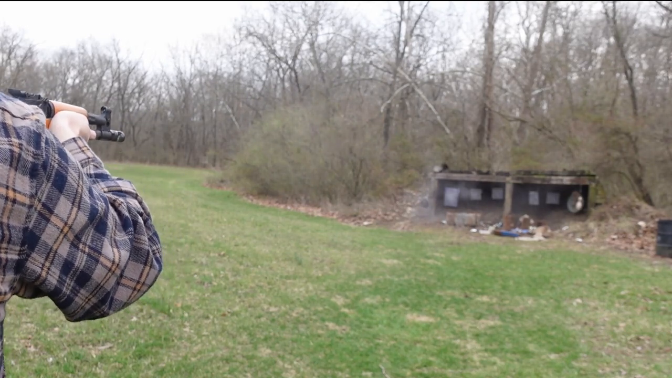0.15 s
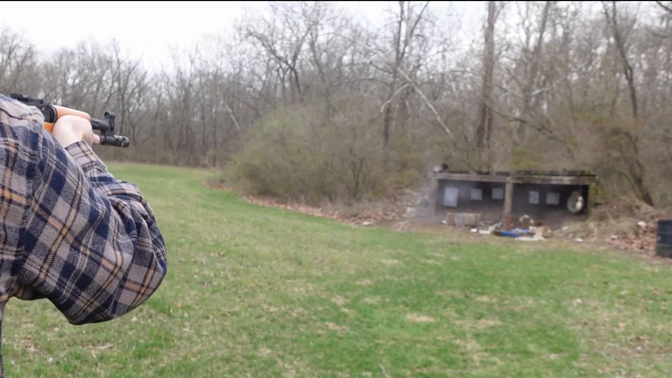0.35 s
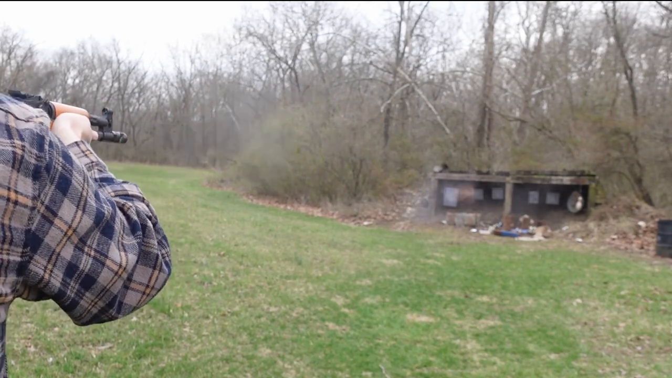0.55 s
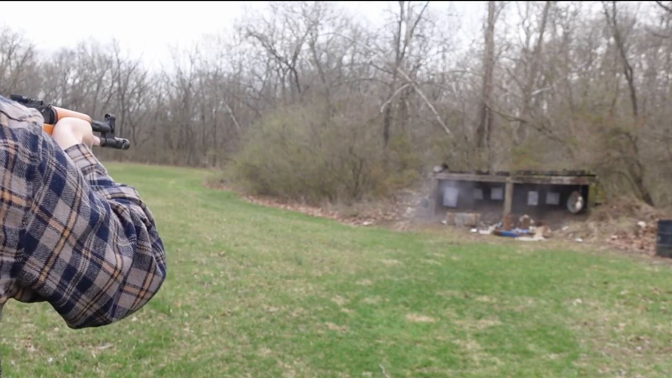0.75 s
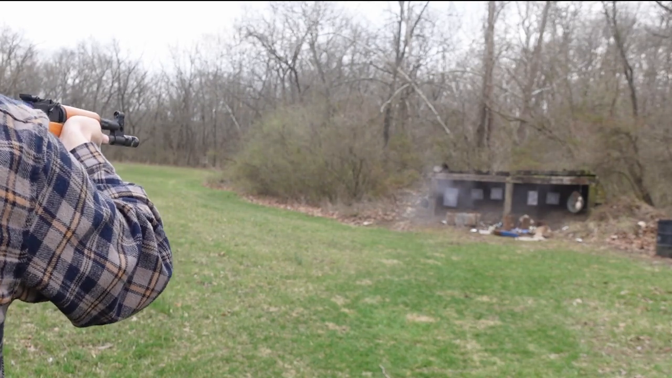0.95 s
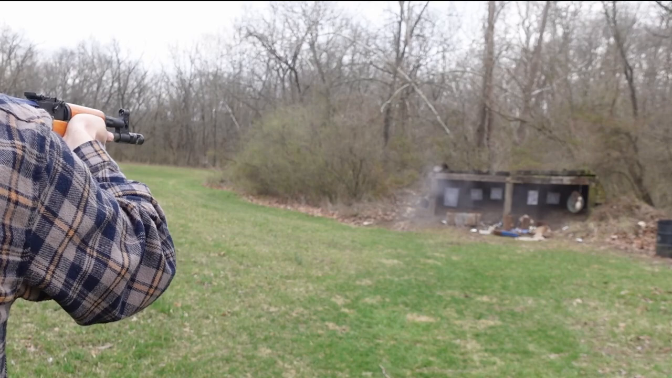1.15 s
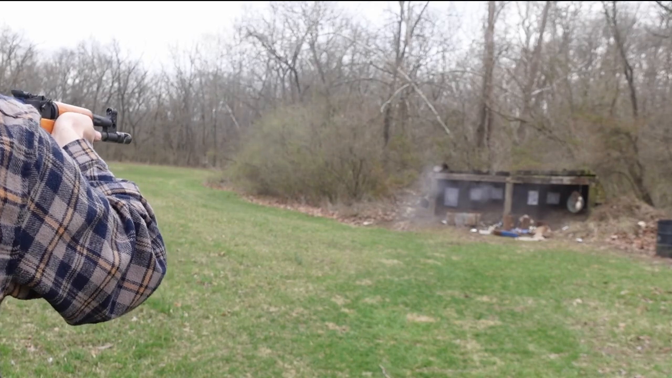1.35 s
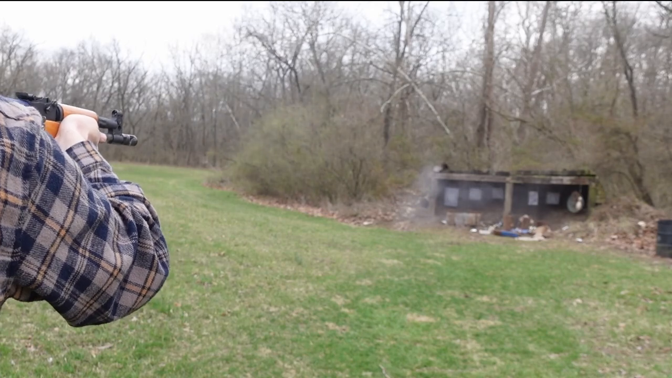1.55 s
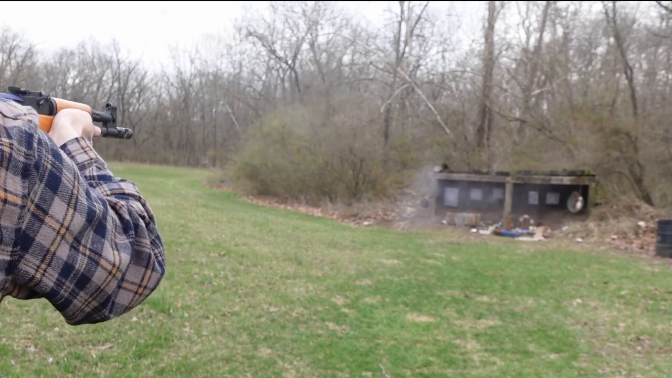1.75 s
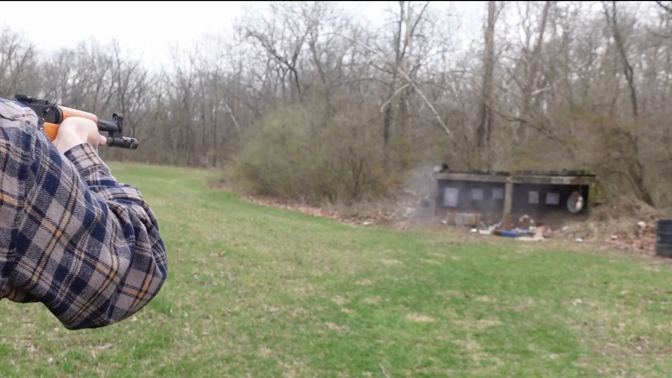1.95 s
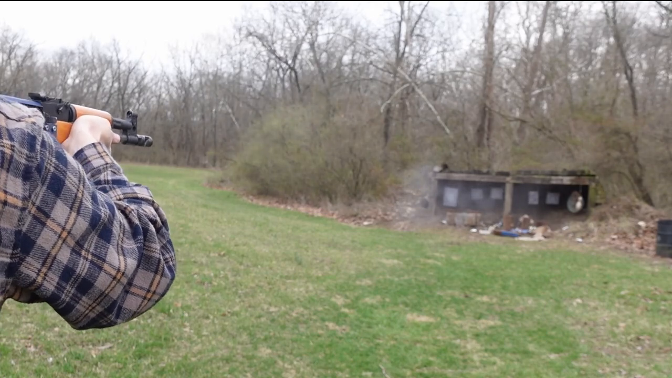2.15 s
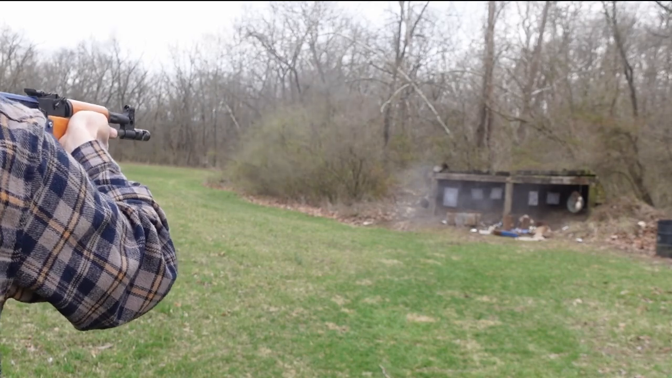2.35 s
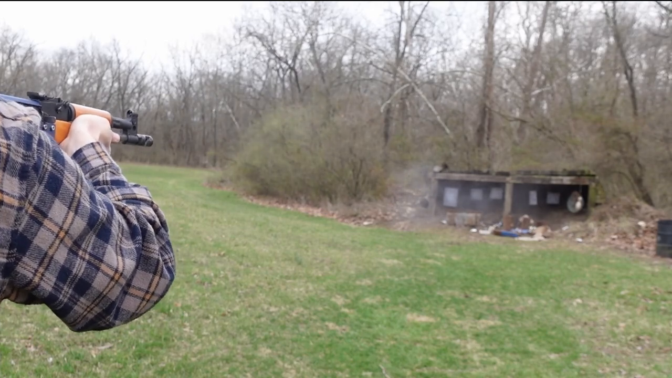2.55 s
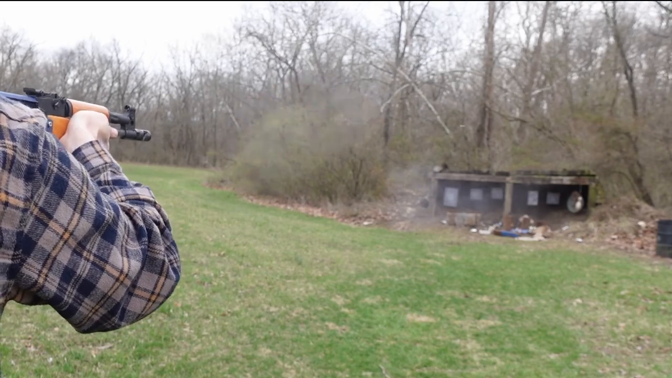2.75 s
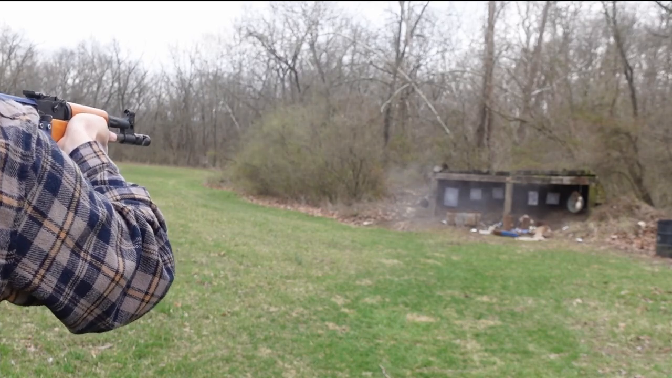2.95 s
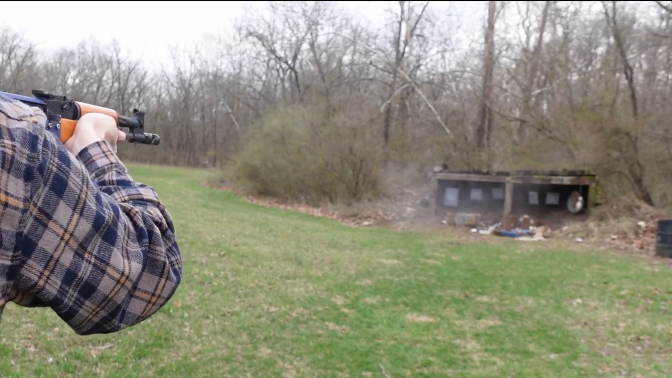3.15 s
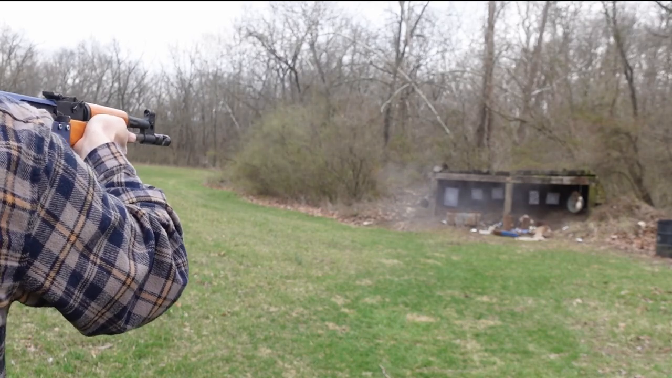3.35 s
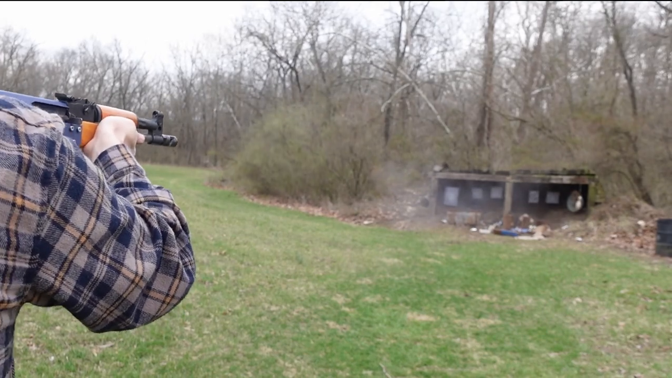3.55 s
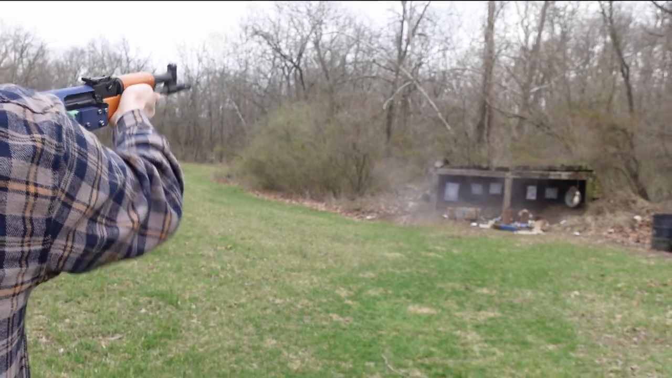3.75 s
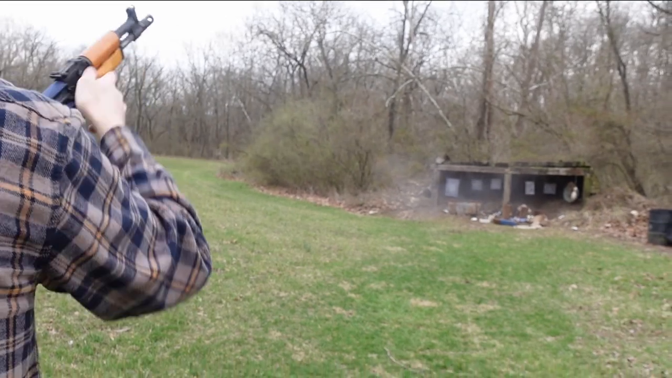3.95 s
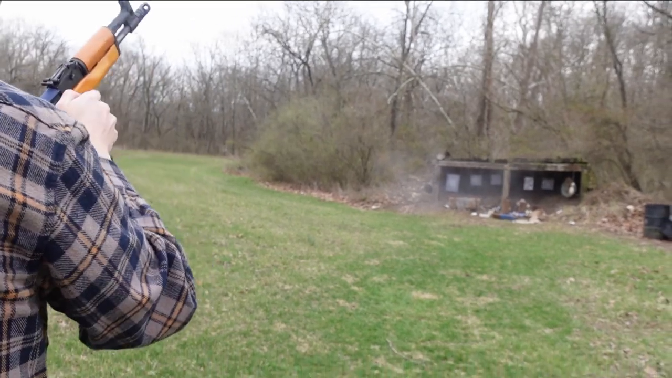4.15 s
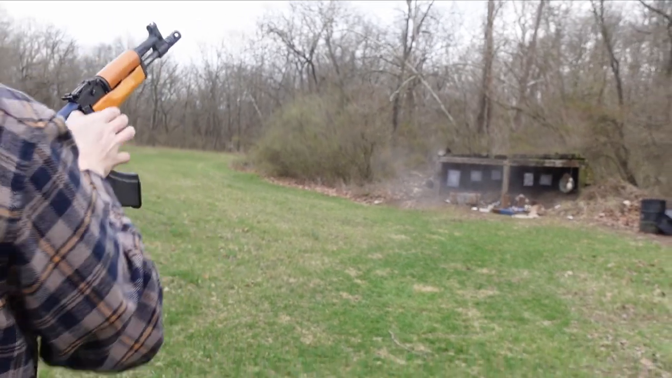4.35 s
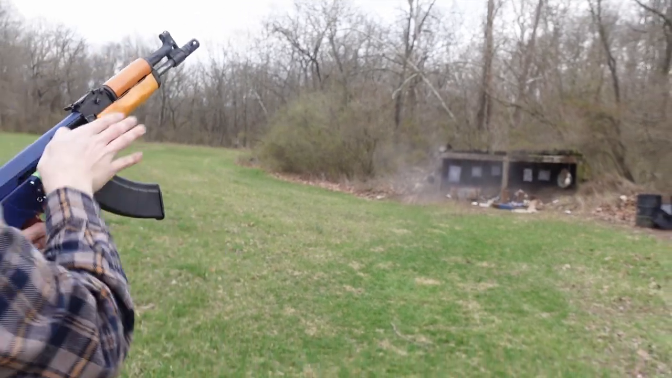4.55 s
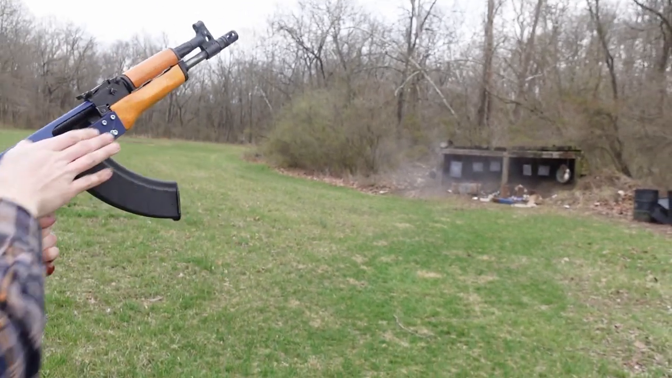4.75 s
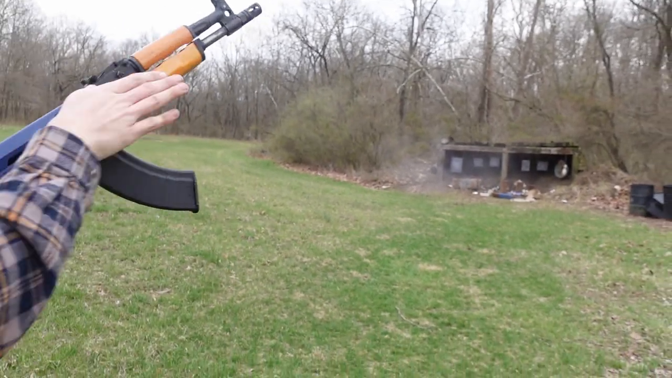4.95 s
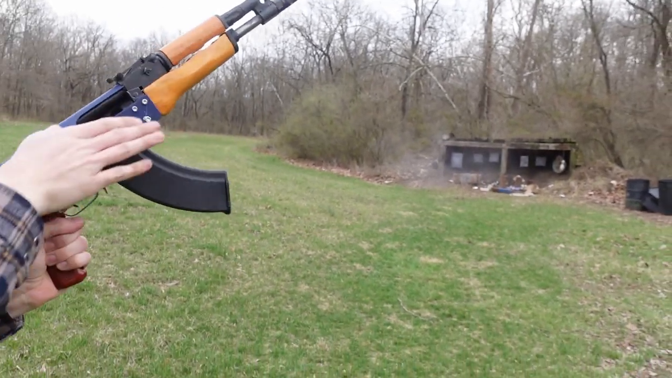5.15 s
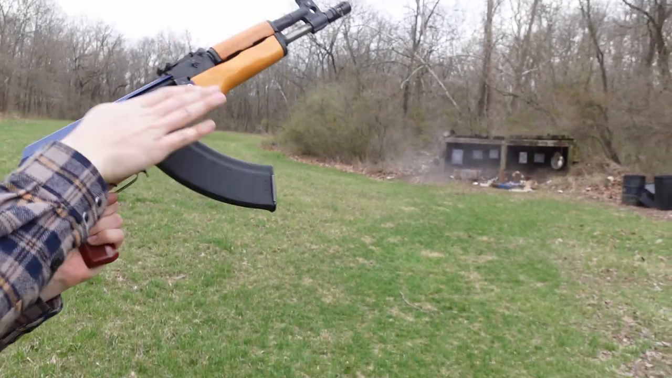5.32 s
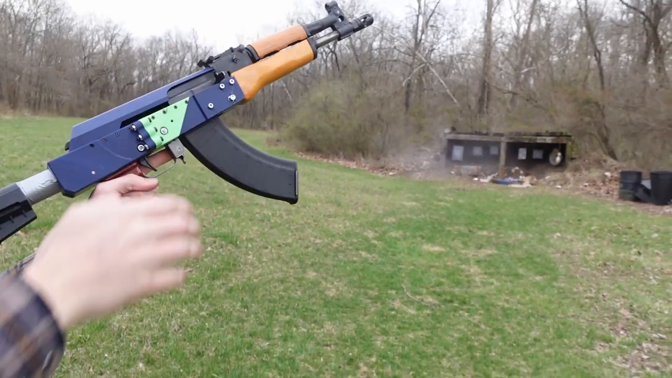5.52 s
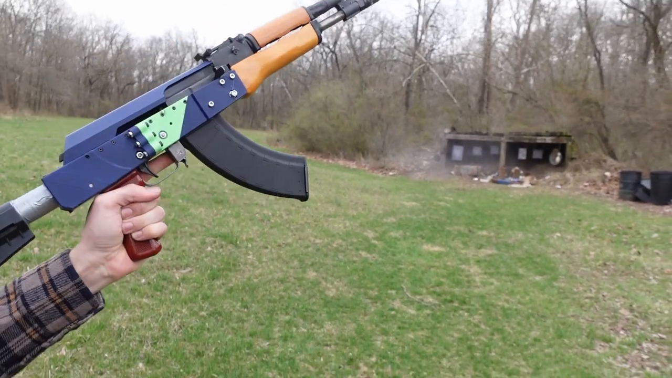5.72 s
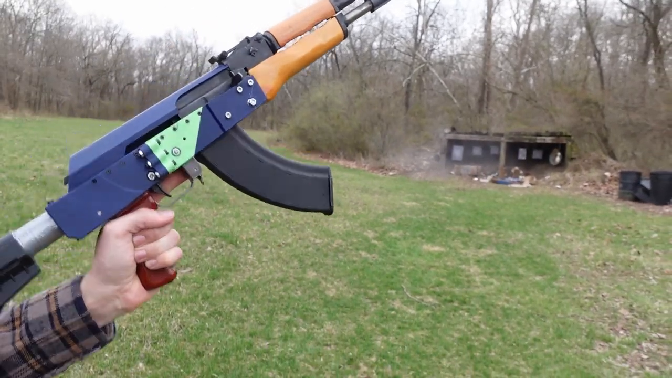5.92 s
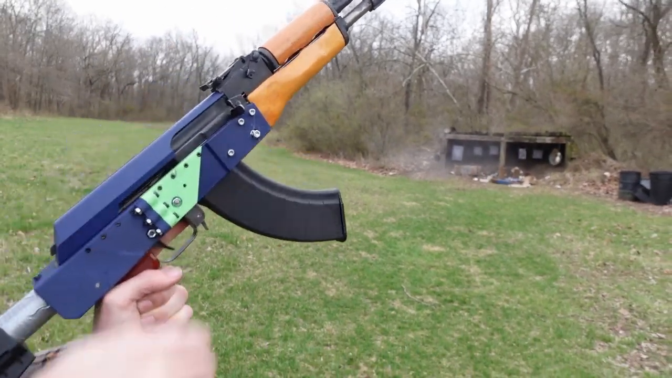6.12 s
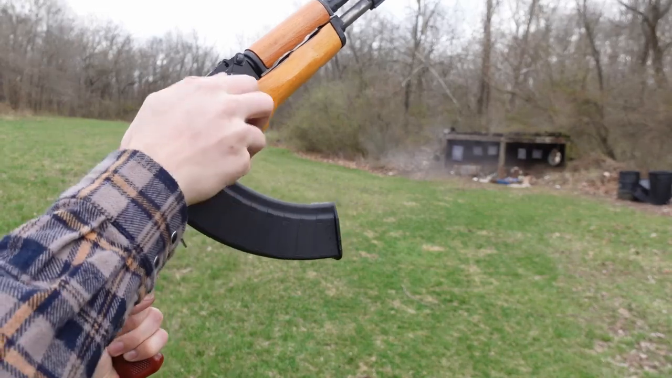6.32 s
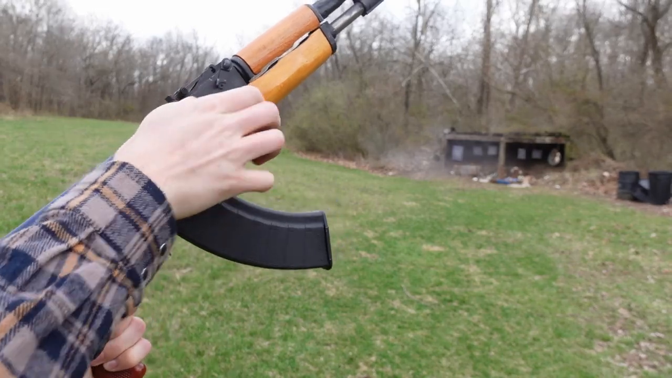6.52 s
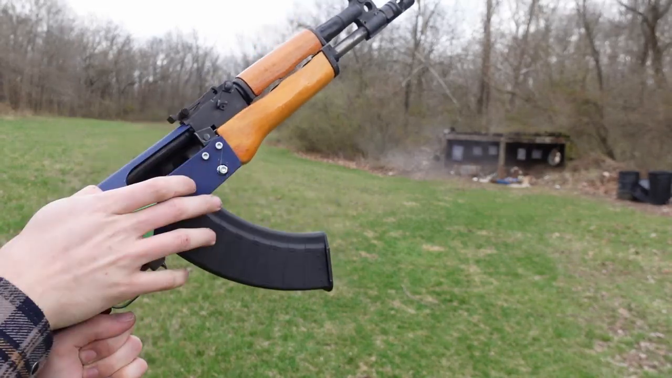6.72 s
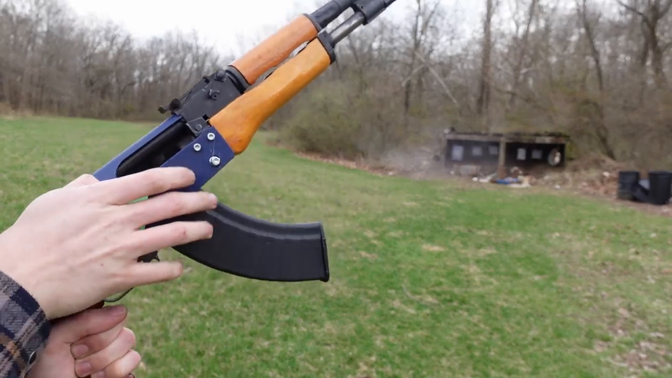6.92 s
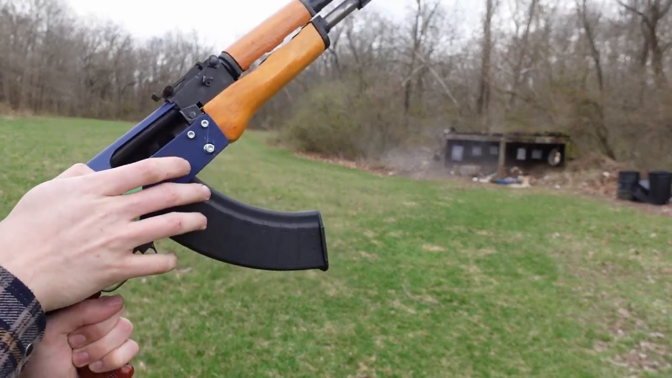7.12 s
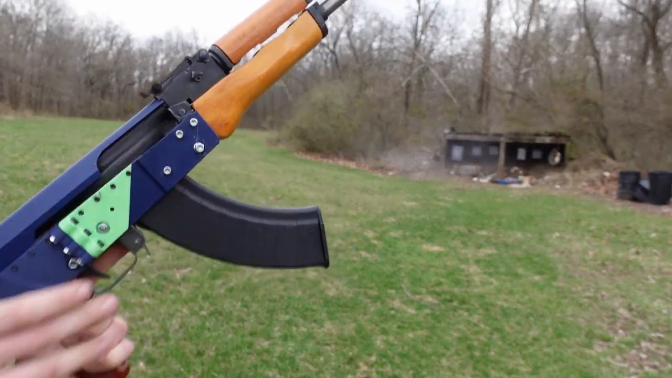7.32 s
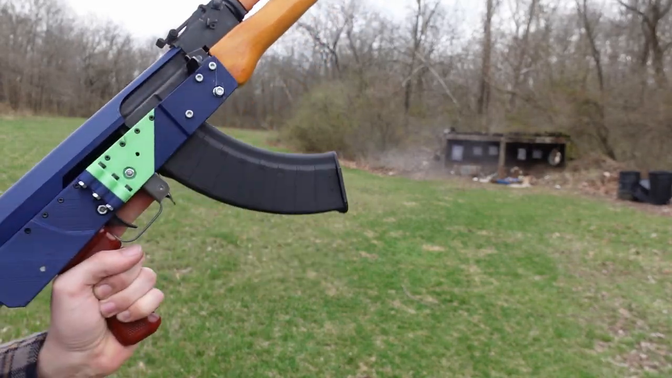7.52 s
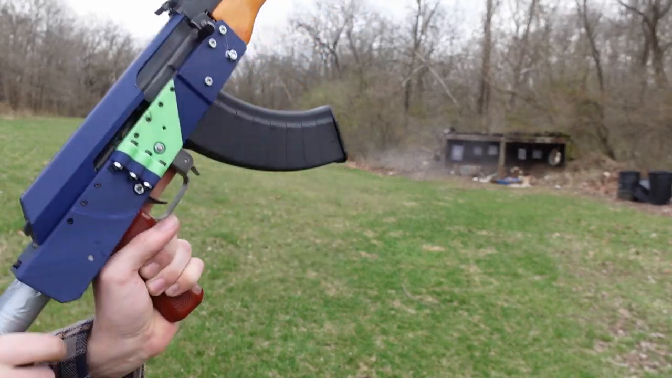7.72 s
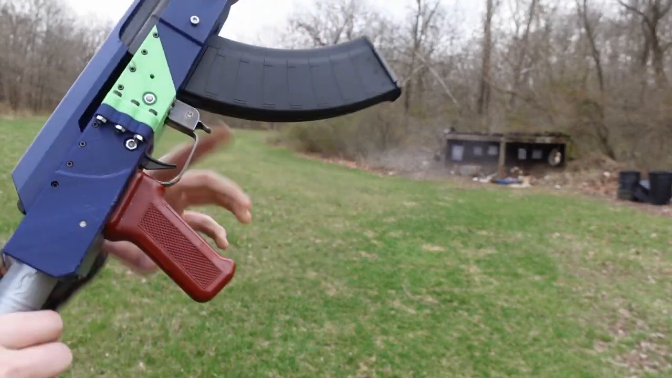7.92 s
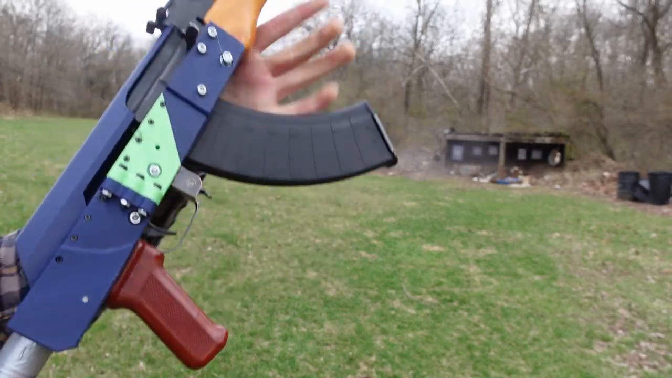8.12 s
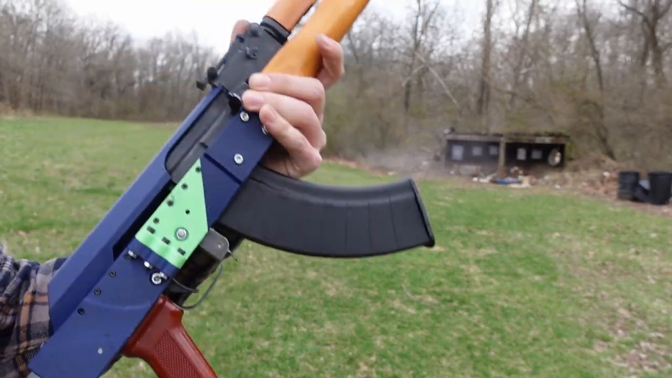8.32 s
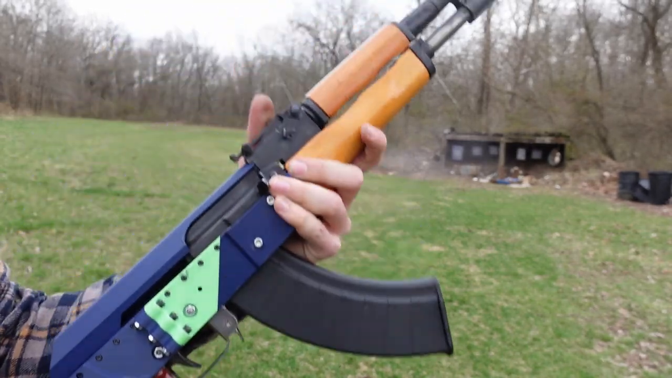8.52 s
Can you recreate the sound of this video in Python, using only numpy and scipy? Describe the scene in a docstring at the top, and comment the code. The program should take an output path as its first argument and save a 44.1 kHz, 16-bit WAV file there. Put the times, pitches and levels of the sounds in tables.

```python
"""A grass range edged by woods: a rifle fires six shots at steel plates, close to the microphone.
An earlier shot is still dying away. Shaped noise makes the blasts and their scatter off ground and trees;
decaying tones ring the plates and falling tones are two fragments that whine away.
Then the bolt is worked by hand, in clusters of small steel impacts and gritty rubbing noise, and the rifle
is turned over in a rustle of sleeves. Beyond lie quiet air noise and the faint wavering tone of a far engine."""
import sys
import numpy as np
from scipy import signal
from scipy.fft import rfft, irfft
from scipy.io import wavfile

SR = 44100
rng = np.random.default_rng(int(sys.argv[2]) if len(sys.argv) > 2 else 0)


def inscribe(sig):
    """Save sig as 16-bit PCM at rate SR to the path in sys.argv[1].

    A 1-D sig is mono; a 2-D sig holds one channel per row.
    Samples are clipped to [-1, 1] before scaling.
    """
    pcm = np.round(np.clip(np.atleast_2d(sig).T, -1, 1) * 32767)
    wavfile.write(sys.argv[1], SR, pcm.astype(np.int16))


N = 377916

# Shots, the first begun before the start: (time [s], blast level [dB], echo level [dB], impact level [dB],
# swing of the plate [0-1], twists [per s], index of the plate hit)
SHOTS = [(-.45, -20, -22, -24, 0, 7, 0), (.073, -18.5, -20.5, -16.5, .3, 7.8, 1),
         (.5595, -17, -20, -18.5, 0.5, 6.4, 1), (1.204, -18.5, -20, -15.5, 0.23, 5.2, 2),
         (1.7067, -17.5, -20.5, -19.5, .3, 7.25, 3), (2.3325, -18, -21, -21, 0.4, 7.2, 4),
         (2.755, -17.5, -20.5, -14.5, .65, 3.96, 5)]
# Modes of each steel plate, one list a plate: (frequency [Hz], level [dB], t60 [s])
PLATE_MODES = [
    [(2471, -42, 2.5), (2735, -38, 2.5), (2907, -32, 2.5), (3031, -41, 2.5), (3418, -34, 2),
     (5604, -43, 1.8), (7009, -46, 1.6)],
    [(1647, -39, 1.5), (2632, -36, 1.1), (3063, -41, 1.4), (5195, -51, 1), (5873, -53, 1), (6330, -43, .35)],
    [(1098, -29, 1.3), (1464, -41, 1.5), (2239, -42, 1.3), (2762, -29.5, 1.15), (6535, -32, .6)],
    [(2686, -24.5, .5), (2767, -39, 1.2), (3321, -49, 1.3), (5932, -57, 1.2), (7741, -54, 1.2)],
    [(1798, -41, 1.7), (2239, -42, 1.3), (3478, -45, 1.2), (4103, -30, 1.2), (4107, -26, .3),
     (8205, -45, .4)],
    [(1793, -35, 1.7), (3542, -46, 1.1), (4098, -34, 1.05), (6966, -54, 1)],
]
IMPACT_DELAY_S, RING_DELAY_S = .0972, .106  # after the blast
# Spectrum of the blast and the bullet impact: (frequency [Hz], relative level [dB])
BLAST_SPECTRUM = [(30, -29.5), (120, -25.5), (400, 0), (900, 9.5), (2400, -3), (5500, -2), (8000, -6),
                  (11000, -18.5), (16000, -33)]
# Spectrum scattered back by the ground: (frequency [Hz], relative level [dB])
GROUND_SPECTRUM = [(30, -35.5), (70, -36), (150, -13.5), (400, -10), (900, 2.5), (1500, 0), (2500, -1.5),
                   (5500, -3.5), (8500, -13), (12000, -23), (16000, -37)]
# Spectrum scattered back by the woods: (frequency [Hz], relative level [dB])
WOODS_SPECTRUM = [(30, -48.5), (70, -39), (150, -17.5), (260, -13.5), (400, -4), (700, -1.5), (1100, 1.5),
                  (1800, -1), (2800, -0.5), (5500, -6.5), (8500, -13), (12000, -21), (16000, -40.5)]
# Decay among the trees, before the steady fall in WOODS_SCATTER: (frequency [Hz], t60 [s])
WOODS_T60 = [(60, 1.3), (150, 1.8), (350, 2.25), (700, 2.63), (1400, 2.066), (2800, 1.28), (5600, 0.88),
             (10000, 0.6), (16000, 0.54)]
# The blast's thump, then its returns from large objects:
# (delay [s], peak level before the spread [dB], centre [Hz], width [octaves])
REFLECTIONS = [(.002, -15.5, 824, .95), (.018, -22.5, 680, 0.72), (.07, -21, 955, .4),
               (.0958, -16.5, 1028, .42), (.119, -32, 400, .45), (.134, -31, 420, .45),
               (.128, -42.5, 165, .17), (.218, -18.5, 570, .62), (.243, -34, 380, .3)]
BASS_LAG = 15  # over grass low waves fall behind [cycles per root second, per e-fold of frequency]
PATH_SPREAD_DB = 1.5  # moving air makes each return a little different from shot to shot
# Scatter from grass and bushes: (delay [s], level [dB], attack [s], hold [s], fall [dB per s])
GRASS_SCATTER = (0.0028, -1.94, .005, 0.0466, 140)
# Scatter from the struck stand, same columns; the fall starts before the delay, so it is all but silent
STAND_SCATTER = (0.0932, -6, 0.3, -0.3, 380)
# Scatter from the trees, same columns
WOODS_SCATTER = (0.095, 4.3, .028, 1.2, 16)
# Tumbling fragments: (time [s], level [dB], start frequency [Hz], time until the pitch has halved [s],
# overtone level [dB])
RICOCHETS = [(1.812, -22, 6750, .048, -13), (2.864, -26, 3300, .04, -8)]
# Steel parts of the action meet and rattle: (time [s], level [dB], tilt [dB per octave],
# ring of the part struck first [Hz], number of contacts, gap between contacts [s])
CLACKS = [(3.346, -25, 4, 5350, 1, 0), (4.382, -34, 0, 6400, 2, .02), (4.427, -30, -2, 1690, 1, 0),
          (4.496, -30, 1.5, 1540, 1, 0), (4.609, -29.5, 1.5, 1580, 2, .008), (4.635, -23, 3, 5410, 2, .017),
          (4.693, -28.5, -1.5, 5400, 1, 0), (4.711, -21, 0.5, 4960, 3, .011),
          (4.777, -22.5, 2, 1550, 2, .02), (4.843, -30, 0, 5500, 1, 0), (4.859, -23, 4.5, 3720, 3, .023),
          (4.928, -20.5, 3.5, 4520, 2, .008), (4.998, -24.5, 2, 4650, 2, .009),
          (5.017, -20.5, 3.5, 5350, 2, 0.014), (5.044, -24, 6, 6750, 1, 0), (5.109, -23, 4.5, 5300, 1, 0),
          (5.125, -22, 0, 8300, 1, 0), (5.172, -28.5, 2, 5310, 1, 0), (5.185, -27.5, 0, 3320, 3, .0162),
          (5.249, -30, 1.5, 5350, 1, 0), (5.264, -40.5, -2, 1450, 1, 0), (5.407, -40.5, -1, 2470, 1, 0),
          (5.46, -23, 7, 3520, 2, .013), (5.715, -39.5, -3, 1470, 1, 0), (6.583, -34, -4.5, 1320, 1, 0),
          (6.596, -25.5, -4.5, 5180, 2, .01), (6.629, -24.5, -1.5, 6570, 2, .01),
          (6.696, -24.5, 0.5, 1520, 2, .013), (6.805, -35.5, -6, 1460, 1, 0), (6.91, -35, -1, 1500, 1, 0),
          (6.93, -26, 0.5, 3300, 1, 0), (6.954, -24.5, -0.5, 3480, 3, .0095),
          (7.001, -22.5, 0.5, 5500, 1, 0), (7.017, -34.5, -2, 1360, 1, 0), (7.212, -25.5, 1.5, 3400, 1, 0),
          (7.243, -24, -0.5, 1460, 1, 0), (7.27, -23, -1.5, 1590, 1, 0), (7.331, -22, 6.5, 2240, 2, .009),
          (7.361, -22, 5, 1670, 1, 0), (7.372, -22, 7.5, 4630, 1, 0), (7.962, -26, -1.5, 4000, 1, 0),
          (8.319, -32, 4, 8010, 2, 0.0093)]
REBOUND_DB = -2  # each contact of a rattle against the one before
# Rings of the small parts, of which a rebound strikes any one: (frequency [Hz])
PART_HZ = [1550, 2061.5, 3450, 4650, 5060, 5410, 6480, 8300]
# Duller knocks of hands, stock and magazine: (time [s], level [dB])
KNOCKS = [(3.345, -32), (3.814, -51), (3.849, -46.5), (3.924, -54), (4.149, -59), (4.375, -43),
          (6.116, -55), (6.331, -68), (6.351, -60), (6.758, -32.5), (7.185, -49), (7.275, -25),
          (7.398, -28.5), (7.444, -29), (7.625, -43.5), (7.831, -44), (7.877, -47), (7.927, -37.5),
          (7.961, -27.5), (8.127, -34), (8.146, -29), (8.163, -35), (8.209, -25), (8.371, -48)]
KNOCK_T60_S = 0.057
# Strokes of steel sliding on steel: (start [s], end [s], level [dB])
SLIDES = [(4.352, 4.505, -47.5), (4.543, 4.65, -39), (4.697, 4.8, -33), (4.834, 4.95, -33),
          (4.994, 5.125, -34.5), (5.165, 5.233, -48.5), (5.427, 5.5, -34), (6.576, 6.716, -33),
          (6.791, 6.83, -58.5), (6.926, 6.982, -47.5), (7.205, 7.288, -40), (7.311, 7.412, -28),
          (7.922, 7.963, -52.5), (8.134, 8.163, -45), (8.317, 8.331, -42)]
SLIDE_ATTACK_S, SLIDE_SWELL_DB, SLIDE_T60_S = .011, 4.5, .075  # the hand pushes harder through each stroke
# Small clacks along a stroke: mean gap, level against the stroke, random spread either way
CHATTER_GAP_S, CHATTER_DB, CHATTER_SPREAD_DB = .024, 3, 1.5
# Spectrum of the action's steel parts: (frequency [Hz], relative level [dB])
ACTION_SPECTRUM = [(30, -48.5), (130, -46.5), (270, -46), (380, -35), (470, -22), (580, -24), (780, -0.5),
                   (900, 0.5), (1150, -3.5), (1600, 1.5), (4000, 0.5), (5400, 0), (8500, -5.5),
                   (11500, -18), (16000, -37.5)]
# Spectrum of stock and sleeves: (frequency [Hz], relative level [dB])
STOCK_SPECTRUM = [(30, -42.5), (150, -38.5), (300, -22.5), (480, -10.5), (900, 2), (1300, 2.5), (2200, -2),
                  (4500, -12), (8000, -22), (15000, -42.5)]
# Ringing of the sheet-steel receiver: (frequency [Hz], relative level [dB], t60 [s])
RECEIVER_MODES = [(839.5, -23.5, 0.081), (913, -19, 0.094), (1560, -24, 0.055), (2054, -19, .06),
                  (2630, -18, 0.065), (3410, -23.5, .05), (4930, -29, .1), (5290, -21.5, 0.037),
                  (6380, -30.5, .05), (8060, -25, .06), (9000, -25.5, .05)]
# The recoil spring shivers when the bolt slams home: (time [s], level [dB], t60 [s])
SLAMS = [(5.475, -43, 0.72), (7.375, -38.5, 0.87)]
# Spectrum of the spring: (frequency [Hz], relative level [dB])
SPRING_SPECTRUM = [(100, -30.5), (280, -31), (600, -14), (880, -0.5), (1100, -10), (1500, 1), (2800, 0.5),
                   (5200, -3.5), (8500, -15.5), (15000, -38)]
# Rustle of the sleeves: (time [s], level [dB])
RUSTLE = [(4.3, -92), (4.5, -54.5), (5.2, -61.5), (5.38, -77.5), (6.05, -87), (6.2, -82), (6.5, -83.5),
          (6.8, -64.5), (7.15, -75.5), (7.8, -62), (8.08, -71), (8.28, -62), (8.49, -61), (8.57, -68)]
FIDGETS_PER_S, FIDGET_DB = 7, 4.5  # small knocks while the arms move, level against the rustle
# Far engine: (time [s], frequency [Hz], level [dB])
ENGINE = [(4, 117.4, -95), (5.5, 115, -100), (5.8, 121, -93), (6.05, 117, -96), (6.399, 120.9, -92),
          (7.2, 125, -84), (7.62, 129.6, -79.5), (7.999, 117, -88.5), (8.57, 107.5, -99)]
# Spectrum of the air over the field: (frequency [Hz], relative level [dB])
AIR_SPECTRUM = [(30, -13), (70, -10), (120, -7.5), (250, -12.5), (470, 0), (850, 4), (1500, -3.5),
                (3200, -13.5), (6000, -20), (10000, -24.5), (16000, -29)]
# Stereo width of all noise: (frequency [Hz], side against mid [dB])
WIDTH = [(30, -4), (60, -8), (120, -20), (250, -21.5), (500, -16), (1000, -11.5), (2000, -10), (4000, -9.5),
         (8000, -8), (14000, -5)]
EDGE_HZ = 16000  # upper band limit


def gunfire(size=100000):
    """Blast, bullet impact and the range's answer, whose low part is nearly alike for every shot."""
    out = np.zeros((2, N))
    t = np.arange(size) / SR
    hz = np.fft.rfftfreq(size, 1 / SR)
    terrain = rng.standard_normal((2, 2, size))
    # moving air scrambles the short waves
    alike = np.clip(.93 / np.sqrt(1 + (hz / 1500) ** 4), 0, 1)
    trunks = lumps(size, seconds=.005, depth_db=1.8)
    scatter = np.hypot(swell(t, *GRASS_SCATTER), swell(t, *STAND_SCATTER))
    for s, blast_db, echo_db, impact_db, *_ in SHOTS:
        fresh = rfft(rng.standard_normal(terrain.shape))
        near, far = irfft(alike * rfft(terrain) + np.sqrt(1 - alike ** 2) * fresh)
        ground = noise(size, GROUND_SPECTRUM, white=near, shape=scatter * trunks)
        woods = woods_answer(far, trunks, t)
        add(out, s, amp(echo_db) * (ground + woods) + thumps(size))
        add(out, s, amp(blast_db) * burst(seconds=.0057))
        add(out, s + IMPACT_DELAY_S, amp(impact_db) * burst(seconds=.0045))
    return out


def burst(seconds, size=2048):
    """A short flat-topped pressure burst of noise makes a crack."""
    window = signal.windows.tukey(int(seconds * SR), .3)
    return noise(size, BLAST_SPECTRUM, shape=np.pad(window, (0, size - len(window))))


def thumps(size):
    """One pulse for each path; the longer the path, the more it sweeps downward."""
    out = np.zeros(size)
    hz = np.fft.rfftfreq(size, 1 / SR) + 1e-3
    for delay, db, centre_hz, octaves in REFLECTIONS:
        pitch = np.log(hz / centre_hz)
        turns = hz * delay + BASS_LAG * np.sqrt(abs(delay)) * pitch
        band = -.5 * (pitch / np.log(2) / octaves) ** 2
        pulse = irfft(np.exp(band - 2j * np.pi * turns), size)
        level_db = db + PATH_SPREAD_DB * rng.uniform(-1.1, 1)
        out += amp(level_db) * pulse / abs(pulse).max()
    return out


def woods_answer(white, trunks, t):
    """The trees scatter the blast back; air and twigs take the treble first."""
    size = len(t)
    echo = noise(size, WOODS_SPECTRUM, white=white, shape=trunks)
    f, delay, z = signal.stft(echo, SR, nperseg=256)
    decay = amp(-60 * delay / read(WOODS_T60, f)[:, None])
    woods = signal.istft(z * decay, SR)[1][:, :size]
    return woods * swell(t, *WOODS_SCATTER)


def plates():
    """Each hit plate rings in its modes; the tones throb as it twists on its hanger."""
    out, t = np.zeros((2, N)), clock(1.8)
    onset = 1 - np.exp(-t / 0.0054)
    for s, *_, swing, twists, plate in SHOTS:
        twist = np.cos(2 * np.pi * twists * (t - .028))
        throb = 1 + np.clip(swing, 0, 1) * twist
        for hz, db, t60 in PLATE_MODES[round(plate)]:
            phase = np.array([[0], [rng.uniform(-1.4, 1)]])  # left, right [rad]
            tone = np.sqrt(2) * np.sin(2 * np.pi * hz * t + phase)
            add(out, s + RING_DELAY_S, amp(db - 60 * t / t60) * onset * throb * tone)
    return out


def ricochets():
    """A spinning fragment slows quickly, so its whine falls."""
    out, t = np.zeros((2, N)), clock(.3)
    fade = (1 - np.exp(-t / .002)) * amp(-60 * t / .3)
    for s, db, hz, halving, overtone_db in RICOCHETS:
        angle = 2 * np.pi * np.cumsum(hz / (1 + t / halving)) / SR
        whine = np.sin(angle) + amp(overtone_db) * np.sin(2 * angle)
        add(out, s, amp(db) * fade * whine)
    return out


def action():
    """Sliding, knocks and clacks of the worked bolt all set the receiver ringing."""
    return receiver(slides() + knocks() + clacks())


def clacks(contact_s=0.0029, t60=0.024, part_db=10, part_octaves=0.085, scatter_db=2.5, size=8192):
    """Clacks are tight clusters of small impacts, each ringing its own part."""
    out = np.zeros((2, N))
    t = np.arange(size) / SR
    hz = np.fft.rfftfreq(size, 1 / SR)
    onset = 1 - np.exp(-t / 0.0008)
    fall = amp(-60 * np.maximum(t - contact_s, 0) / t60) + amp(-22.5 - 60 * t / .115)
    for s, db, tilt_db, part_hz in contacts():
        part = part_db * np.exp(-.5 * (np.log2((hz + 1) / part_hz) / part_octaves) ** 2)
        # each contact point favours other modes
        spot = scatter_db * np.interp(hz, np.linspace(0, EDGE_HZ, 48), rng.standard_normal(48))
        shape = onset * fall * lumps(size, seconds=0.00059, depth_db=2.5)
        clack = noise(size, ACTION_SPECTRUM, tilt_db, shape=shape, bump_db=part + spot)
        add(out, s, amp(db) * clack)
    return out


def contacts():
    """Every meeting of steel parts as (s, dB, tilt, ring Hz): rattles, and chance chatter along the strokes."""
    hits = []
    for s, db, tilt_db, part_hz, count, gap in CLACKS:
        for k in range(round(count)):
            ring_hz = rng.choice(PART_HZ) if k else part_hz
            hits.append((s + k * gap, db + k * REBOUND_DB, tilt_db, ring_hz))
    for start, end, db in SLIDES:
        for k, (late, force, bright) in enumerate(rng.uniform(-1, 1, size=(16, 3))):
            s = start + (k + .5 + .5 * late) * CHATTER_GAP_S
            if s < end:
                level_db = db + CHATTER_DB + CHATTER_SPREAD_DB * force
                hits.append((s, level_db, 2 * bright, rng.choice(PART_HZ)))
    return hits


def slides():
    """Steel rubbing on steel is a gritty noise that follows the pressure of the hand."""
    grit = lumps(N, seconds=.0018, depth_db=5.0)
    return noise(N, ACTION_SPECTRUM, tilt_db=-2.0, shape=pressure() * grit)


def pressure():
    """How hard the sliding parts rub: each stroke bites, swells and dies away."""
    out, t = np.zeros((2, N)), clock(.5)
    for start, end, db in SLIDES:
        length = max(end - start, SLIDE_ATTACK_S)
        push = amp(SLIDE_SWELL_DB * (np.minimum(t / length, 1) - .5))
        add(out, start, push * swell(t, 0, db, SLIDE_ATTACK_S, length, 60 / SLIDE_T60_S))
    return out


def knocks(size=8192):
    """Hands, stock and magazine knock as short, dull, quickly damped noise."""
    out = np.zeros((2, N))
    t = np.arange(size) / SR
    shape = (1 - np.exp(-t / 0.0011)) * amp(-60 * t / KNOCK_T60_S)
    for s, db in KNOCKS + fidgets():
        add(out, s, amp(db) * noise(size, STOCK_SPECTRUM, shape=shape))
    return out


def fidgets():
    """Small chance knocks as (s, dB), as strong as the arms' movement."""
    times, level_db = np.transpose(RUSTLE)
    s = times[0] + (np.arange(80) + rng.random(80)) / FIDGETS_PER_S
    return [(at, np.interp(at, times, level_db) + FIDGET_DB) for at in s if at < times[-1]]


def receiver(x):
    """Adds the ringing of the sheet-steel receiver to whatever strikes it."""
    t = clock(.15)
    ring = sum(amp(db - 60 * t / t60) * np.cos(2 * np.pi * hz * t) for hz, db, t60 in RECEIVER_MODES)
    return x + amp(-26.5) * signal.fftconvolve(x, ring[None], axes=1)[:, :N]


def spring(ring_hz=4958, ring_db=-10):
    """The recoil spring gives a dense steely shiver with one clear tone."""
    out, t = np.zeros((2, N)), clock(0.97)
    for s, db, t60 in SLAMS:
        shiver = noise(len(t), SPRING_SPECTRUM) + amp(ring_db) * np.sin(2 * np.pi * ring_hz * t)
        flutter = lumps(len(t), seconds=0.0056, depth_db=2.0)
        add(out, s, amp(db - 60 * t / t60) * shiver * flutter)
    return out


def sleeves():
    """Flannel rustles, an uneven noise, as the rifle is turned over."""
    level_db = np.interp(np.arange(N) / SR, *np.transpose(RUSTLE))
    folds = lumps(N, seconds=0.0089, depth_db=3)
    return noise(N, STOCK_SPECTRUM, shape=amp(level_db) * folds)


def engine():
    """The far engine drones as one wavering tone with a weak octave above."""
    s, hz, db = np.transpose(ENGINE)
    t = np.arange(N) / SR
    angle = 2 * np.pi * np.cumsum(np.interp(t, s, hz)) / SR
    tone = np.sin(angle) + amp(-26) * np.sin(2 * angle)
    return np.sqrt(2) * amp(np.interp(t, s, db)) * tone * lumps(N, seconds=.15, depth_db=3.5)


def air():
    """Still air over the field is a quiet noise of slightly uneven level."""
    return amp(-79) * noise(N, AIR_SPECTRUM) * lumps(N, seconds=.12, depth_db=-1.9)


def amp(db):
    """Decibels to gain."""
    return 10 ** (np.asarray(db) / 20)


def evened(x):
    """Scales to rms 1."""
    return x / np.sqrt(np.mean(x ** 2) + 1e-20)


def read(points, hz):
    """Reads a spectrum on a log-frequency axis."""
    f, value = np.transpose(points)
    return np.interp(np.log(hz + 1), np.log(f), value)


def clock(seconds):
    """Sample times from zero."""
    return np.arange(int(seconds * SR)) / SR


def add(mix, s, sound):
    """Mixes a sound in at time s, which may lie before zero."""
    at = round(s * SR)
    sound = sound[..., max(-at, 0):]
    part = mix[:, max(at, 0):][:, :sound.shape[-1]]
    part += sound[..., :part.shape[1]]


def swell(t, delay, db, attack, hold, fall):
    """Silence until the delay, then a linear attack; past the hold, a steady fall in dB per second."""
    return np.clip((t - delay) / attack, 0, 1) * amp(db - fall * np.maximum(t - delay - hold, 0))


def lumps(size, seconds, depth_db):
    """A random gain of rms 1 that changes on the given time scale."""
    knots = rng.standard_normal(size // 8)
    level_db = depth_db * np.interp(np.arange(size) / SR / seconds, np.arange(len(knots)), knots)
    return evened(amp(level_db))


def noise(size, spectrum, tilt_db=0, white=None, shape=1, bump_db=0):
    """White noise takes the envelope shape, then rings through the spectrum, with a width for each pitch."""
    white = rng.standard_normal((2, size)) if white is None else white
    hz = np.fft.rfftfreq(size, 1 / SR)
    tilt = tilt_db * np.log2(np.maximum(hz, 800))  # acts above 800 Hz
    gain = evened(amp(read(spectrum, hz) + tilt + bump_db))
    # minimum phase: nothing sounds before its cause
    cepstrum = irfft(np.log(gain), size)
    causal = np.exp(rfft(cepstrum * (1 + np.sign(np.fft.fftfreq(size)))))
    mid, side = rfft(white * shape) * causal
    side = side * amp(read(WIDTH, hz))
    return irfft(np.array([mid + side, mid - side]), size)


def scene():
    """The shots lie a little to the right, the handling a little to the left, the field in the middle."""
    shooting = (gunfire() + plates() + ricochets()) * amp([[-.5], [.5]])
    handling = (action() + spring() + sleeves()) * amp([[.7], [-.7]])
    return shooting + handling + engine() + air()


def record(dry, ceiling=1.0, low_cut_hz=45):
    """The microphone rounds off the loudest peaks and thins the deep bass; then the band limit."""
    rounded = ceiling * np.tanh(dry / ceiling)
    low_cut = signal.butter(1, low_cut_hz, "highpass", fs=SR, output="sos")
    thinned = signal.sosfilt(low_cut, rounded)
    band_limit = signal.firwin(401, EDGE_HZ, window=("kaiser", 9), fs=SR)
    return signal.oaconvolve(thinned, band_limit[None], "same")


dry = scene()
out = record(dry)
inscribe(out)
```